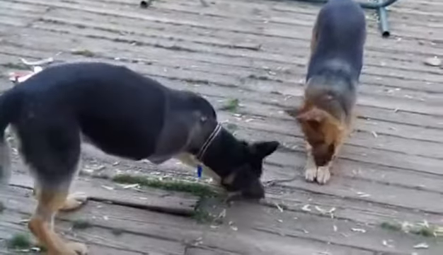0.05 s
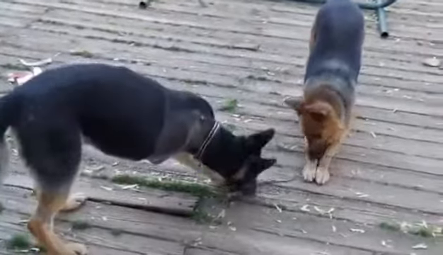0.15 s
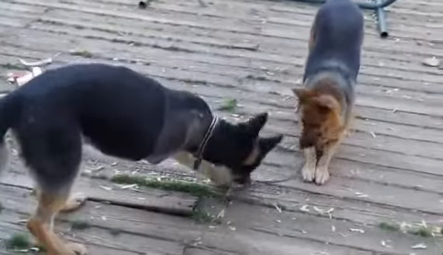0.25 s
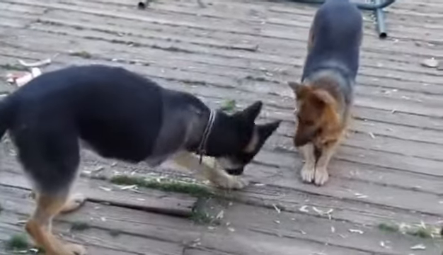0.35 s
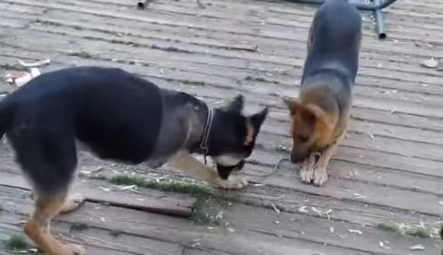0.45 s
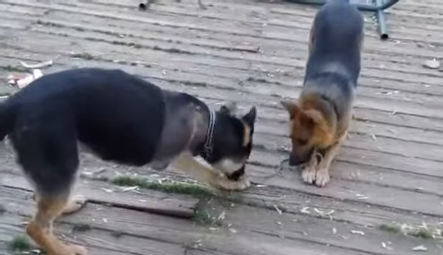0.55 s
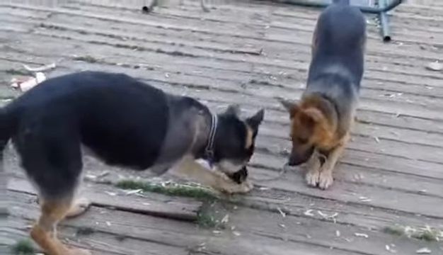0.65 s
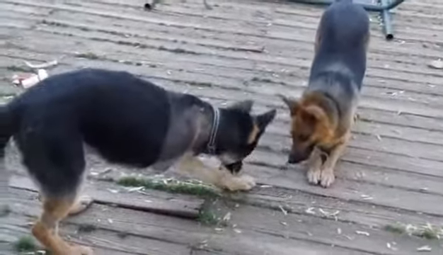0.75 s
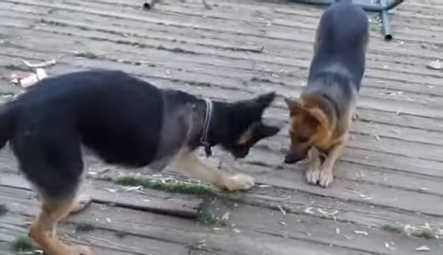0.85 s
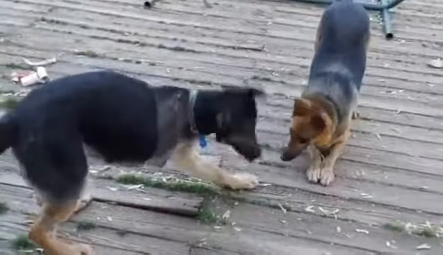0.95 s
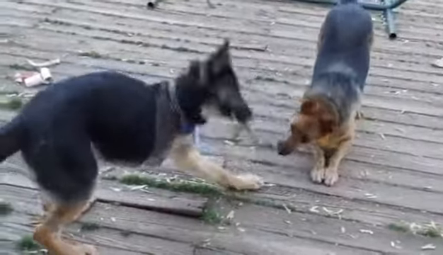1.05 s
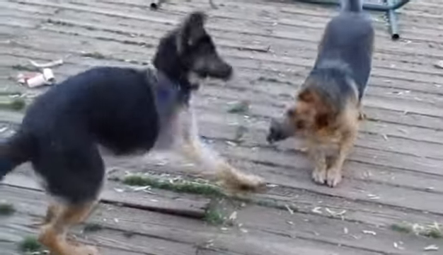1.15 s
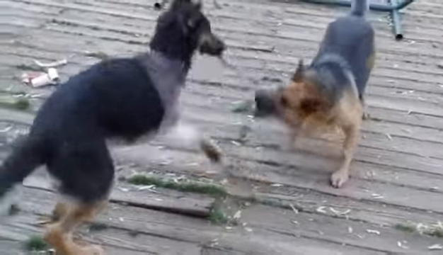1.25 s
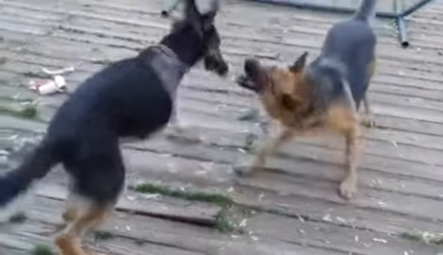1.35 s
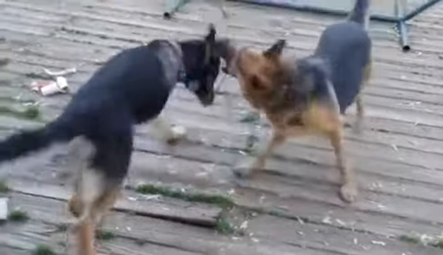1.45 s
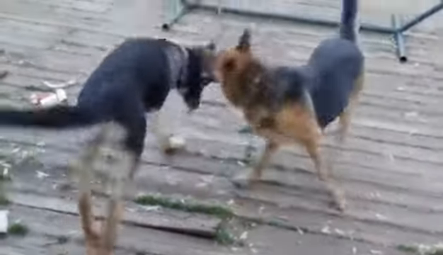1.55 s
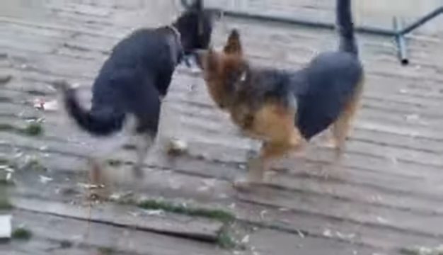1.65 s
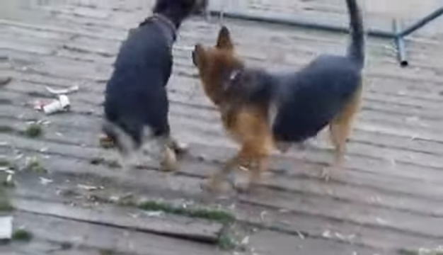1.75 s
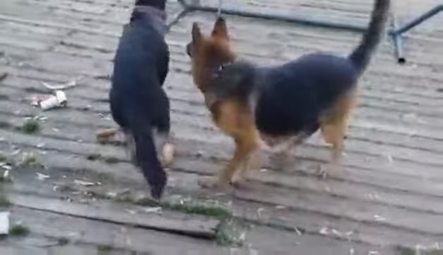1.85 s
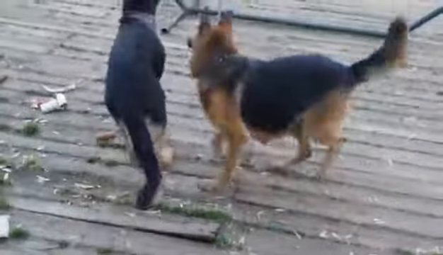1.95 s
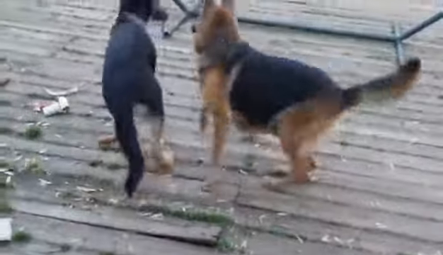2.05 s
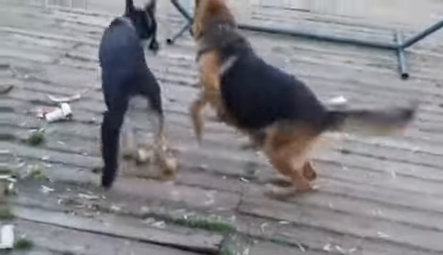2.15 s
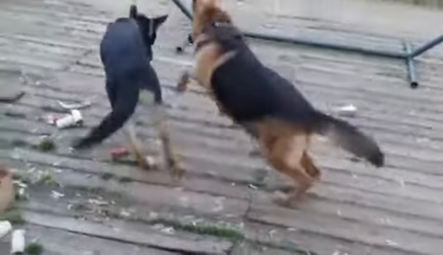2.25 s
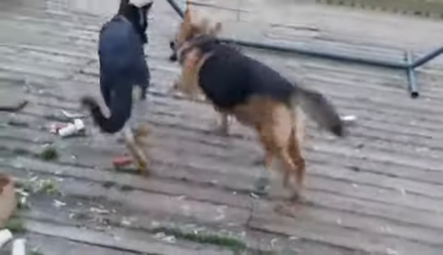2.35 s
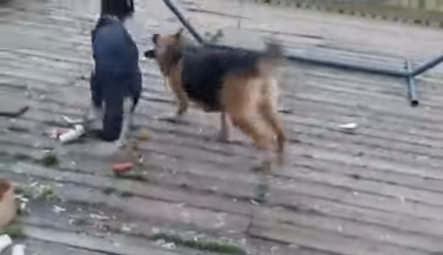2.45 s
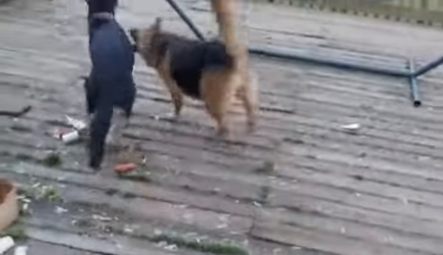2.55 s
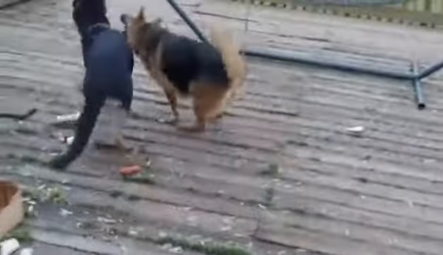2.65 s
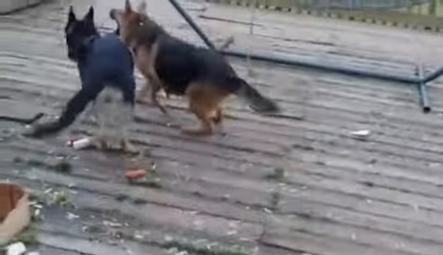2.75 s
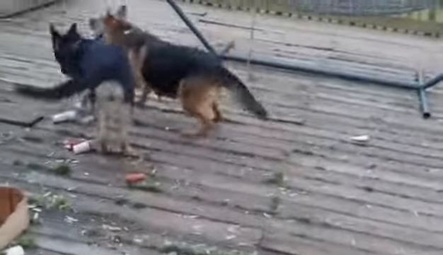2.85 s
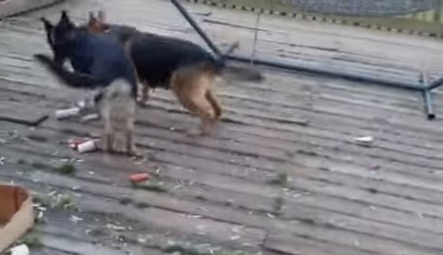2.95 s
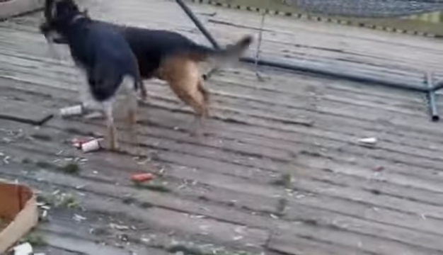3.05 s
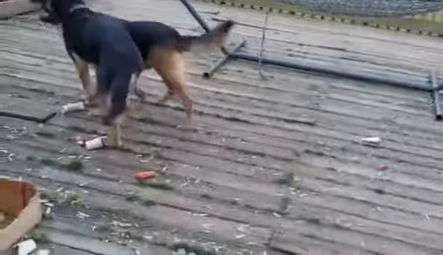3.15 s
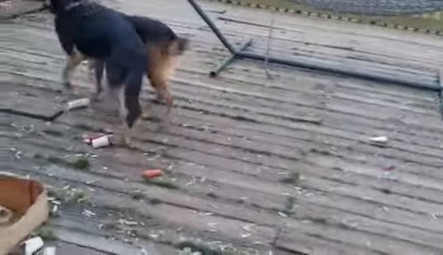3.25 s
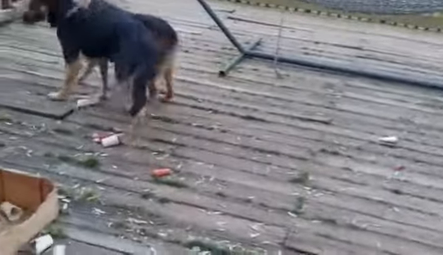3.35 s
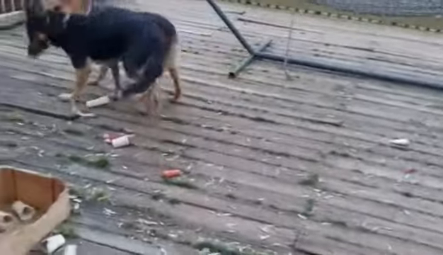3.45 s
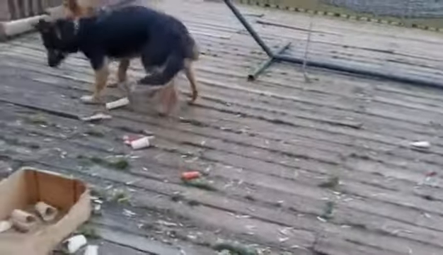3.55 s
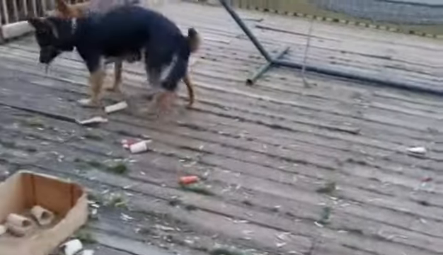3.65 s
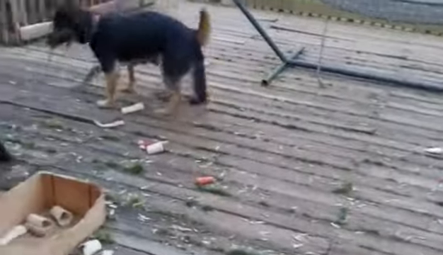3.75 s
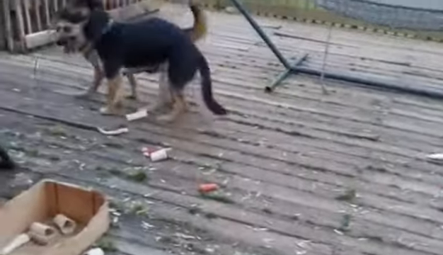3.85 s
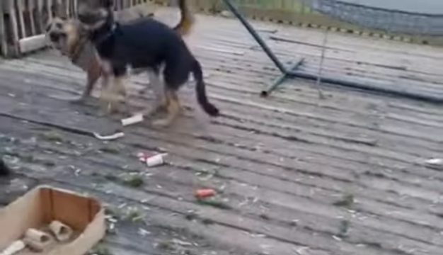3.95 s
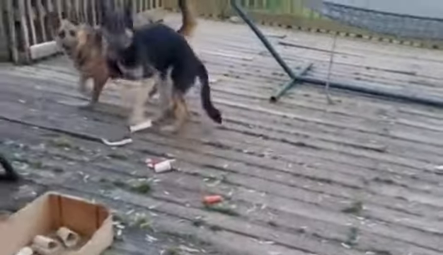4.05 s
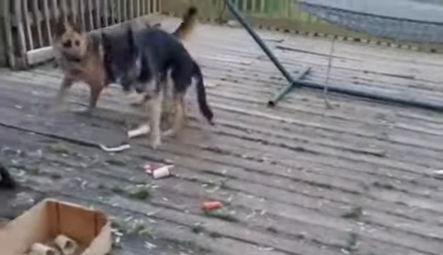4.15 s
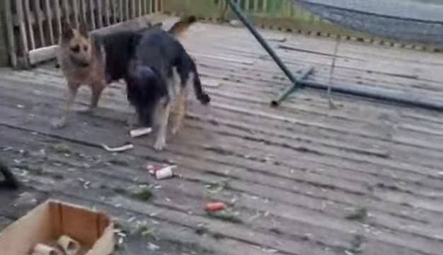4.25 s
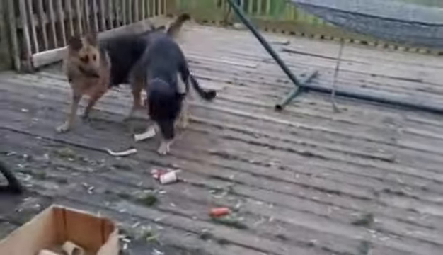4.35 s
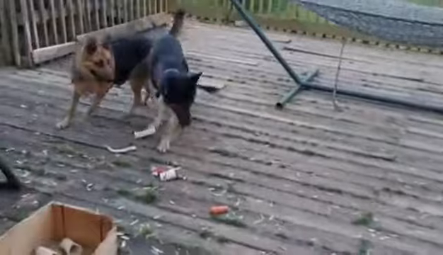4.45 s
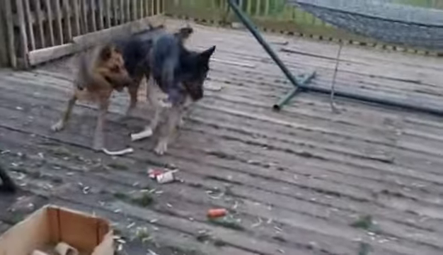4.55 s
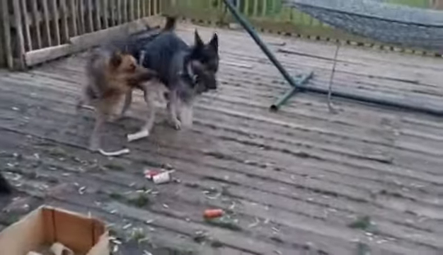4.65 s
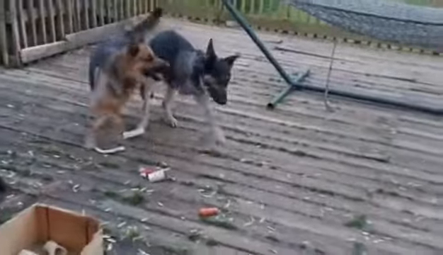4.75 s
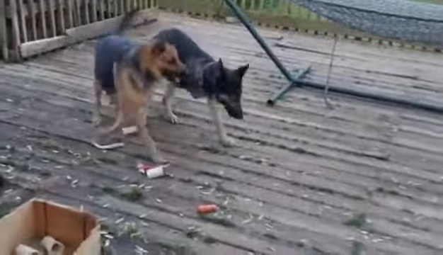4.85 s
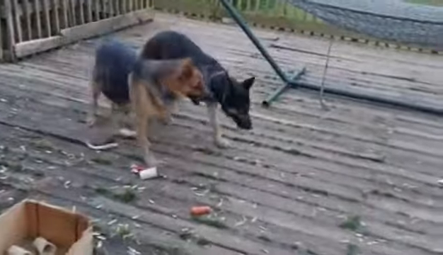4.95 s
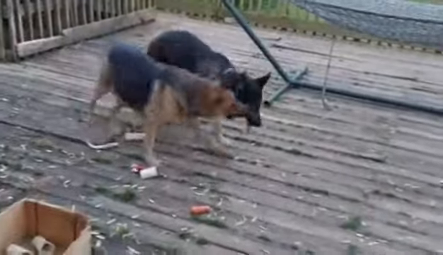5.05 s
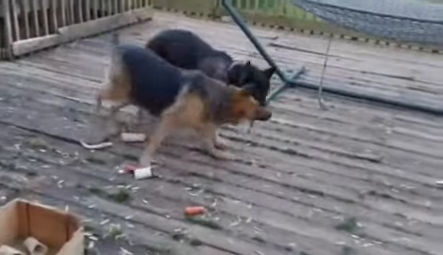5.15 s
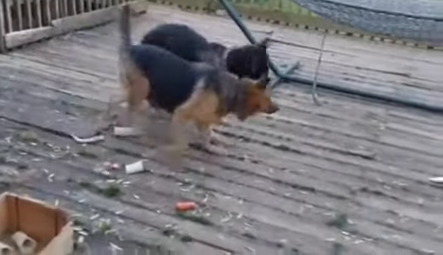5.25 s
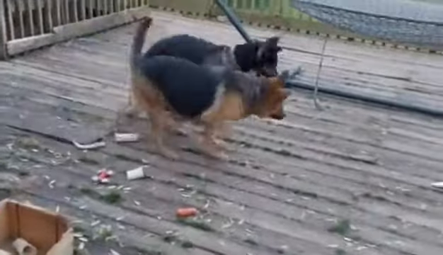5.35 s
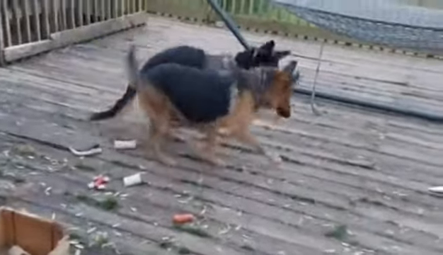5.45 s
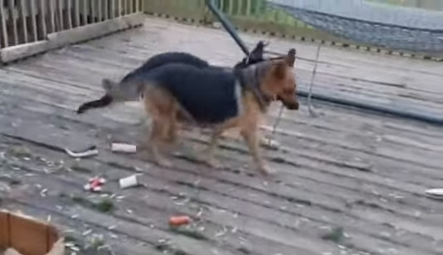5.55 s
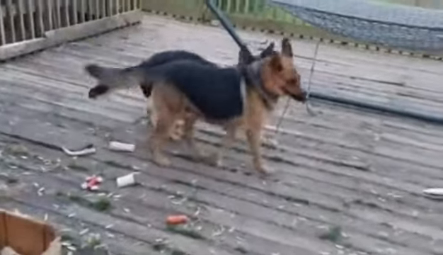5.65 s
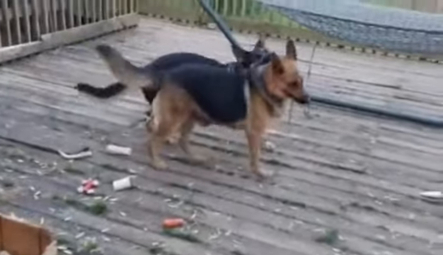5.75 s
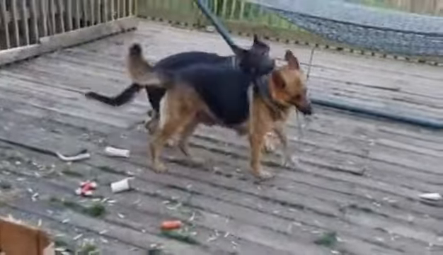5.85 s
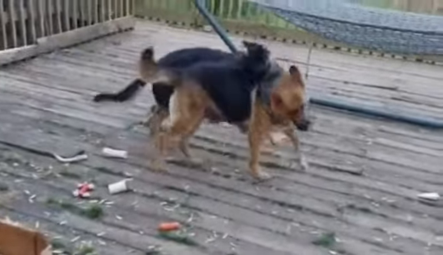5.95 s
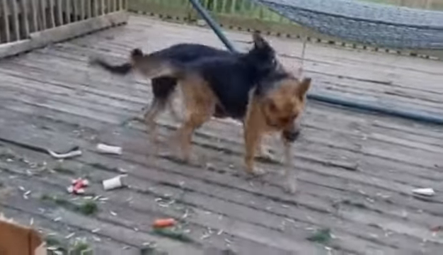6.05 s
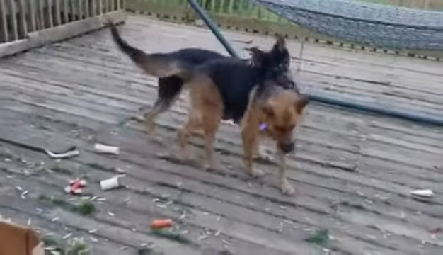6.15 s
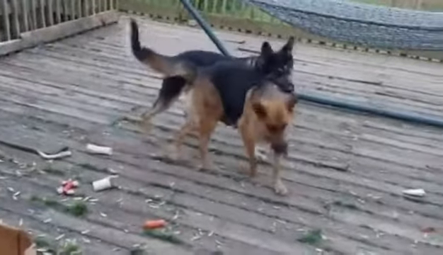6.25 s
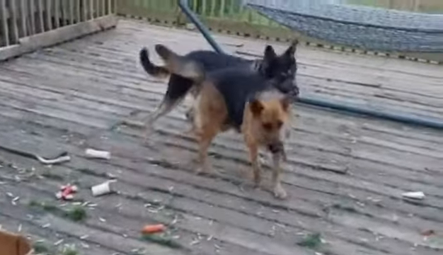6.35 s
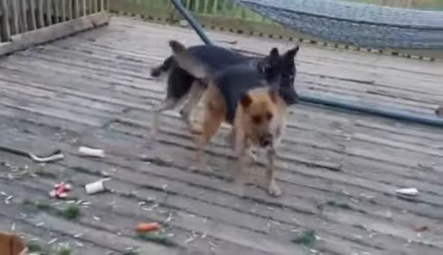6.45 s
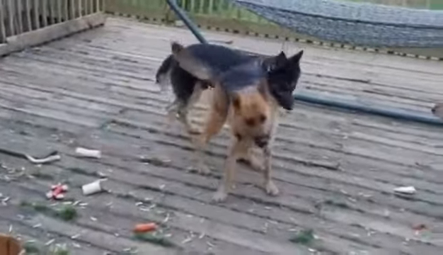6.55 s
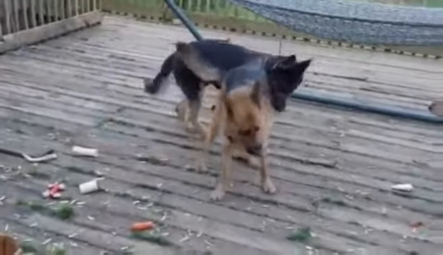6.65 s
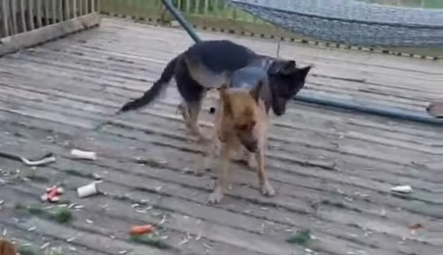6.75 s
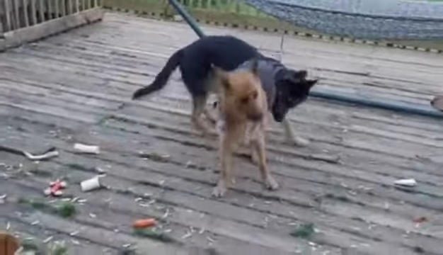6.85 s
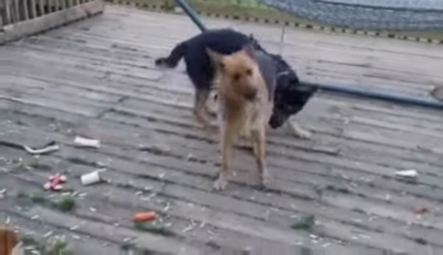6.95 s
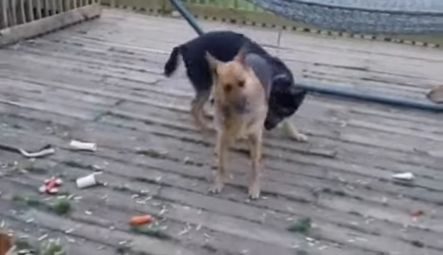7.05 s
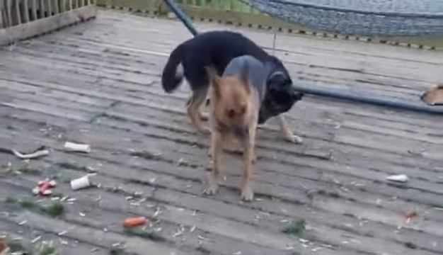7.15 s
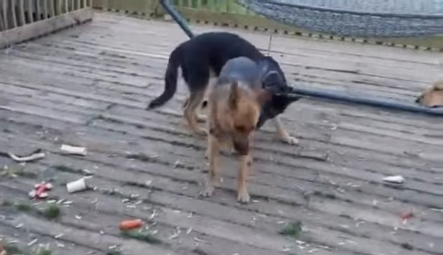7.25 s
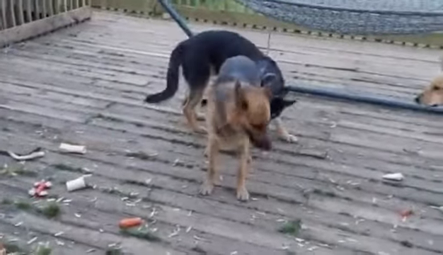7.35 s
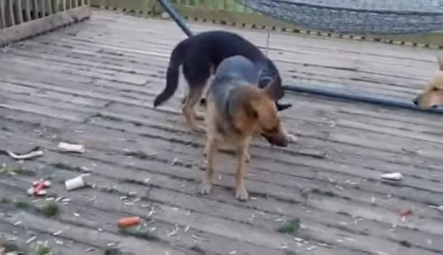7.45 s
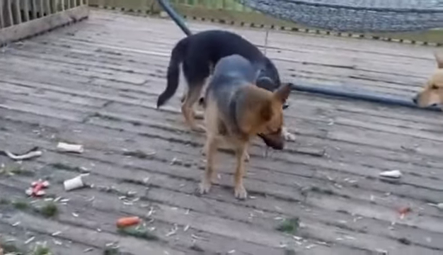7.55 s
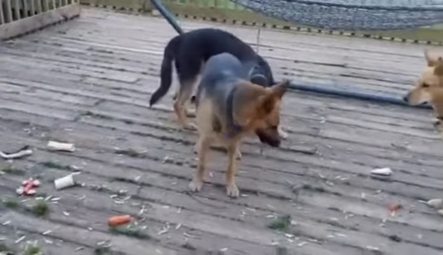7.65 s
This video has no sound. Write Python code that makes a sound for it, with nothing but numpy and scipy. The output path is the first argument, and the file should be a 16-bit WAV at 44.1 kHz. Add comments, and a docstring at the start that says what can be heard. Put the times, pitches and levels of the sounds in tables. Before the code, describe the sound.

Outdoors on a wooden deck, heard in stereo from a few metres. The first second is nearly silent: faint low yard rumble and a barely audible tap around 0.6. From 1.0 claws tick and scratch, and at 1.4 a paw lands with a hollow thud; faint collar tags clink between 1.5 and 1.7. Scraping and low thumps grow through 2.5. At 2.63 comes a bright claw snap with a short choked metal ping, then a dense clatter of woody knocks and heavy thuds until 3.3, with separate hits at 3.5 and 3.75. It calms around 4, leaving light scuffs. Scraping resumes at 4.6, hard knocks cluster from 4.9 to 5.2, and another burst ends with a strong thump at 5.6. A short, rough, low growl follows from 5.8 to 6.25. Soft drags and ticks continue, one thud falls at 6.9, and a low distant motor hum swells to the end at 7.7.

```python
"""Dogs wrestling on a deck

Two big dogs wrestle on a wooden deck, a few metres from a phone with two microphone ports.
Thuds and knocks ring the deck modes; claws tick and scrape as filtered noise and stick-slip grit.
Tags and a metal tube ring as decaying sines; a pulse train through throat resonances growls.
Behind them: shaped noise for the yard, two narrow noise lines for a motor, and scattered echoes."""
import sys
import numpy as np
from scipy import signal
from scipy.fft import rfft, irfft, next_fast_len
from scipy.io import wavfile
from scipy.ndimage import uniform_filter1d, map_coordinates

SR = 44100
rng = np.random.default_rng(int(sys.argv[2]) if len(sys.argv) > 2 else 0)


def put_to_file(sound):
    """Save the sound as 16-bit audio at rate SR, in the file named by the first command-line argument."""
    columns = np.atleast_2d(sound).T  # one column per channel
    safe = np.clip(columns, -1, 1)
    whole_steps = np.round(safe * 32767)
    wavfile.write(sys.argv[1], SR, whole_steps.astype(np.int16))


N = 340011
T = np.arange(N) / SR

# yard noise, relative density: (frequency [Hz], level [dB])
YARD_SPECTRUM = [(18, -18), (30, -2), (130, 2.5), (223, -3.5), (435, -35), (592, -12.5), (1160, -33),
                 (3870, -45.5), (4400, -47), (5410, -38.5), (12300, -36.5), (14000, -69.5)]
YARD_DB = -62
# motor lines: (frequency [Hz], width of each of two filter passes [Hz])
HUM_LINES = [(86, 12), (587, 30)]
# motor loudness: (time [s], low line level [dB], high line level [dB])
HUM_LEVELS = [(0, -84, -90), (3.3, -59.5, -82), (4.2, -68, -74.5), (6.901, -68, -75), (7.301, -61, -71),
              (7.71, -51, -77)]
# growl contour: (time [s], pitch before jitter and bend [Hz], level [dB])
GROWL_CONTOUR = [(5.791, 118, -43.5), (5.859, 120.3, -42.5), (5.89, 123.6, -33), (5.959, 123.5, -33),
                 (6.082, 122, -37), (6.15, 119, -40), (6.179, 121.5, -46), (6.27, 110.8, -61)]
# throat and muzzle resonances: (frequency [Hz], width per pass [Hz], relative level [dB])
THROAT_MODES = [(117, 87, 1.5), (214, 81, -3), (369, 69, -9), (502, 110, -6.5), (720, 90, -9),
                (1250, 400, -18.5)]
# deck modes before detuning and damping: (frequency [Hz], relative level [dB], t60 [s])
DECK_MODES = [(67, 5, 0.34), (98.469, 6, 0.21), (125.9, 5.5, 0.15), (194.2, 2.5, 0.07662), (230.6, 0, 0.13),
              (398, -.5, 0.1308), (527, -5, 0.086), (630, 4, 0.08), (719.47, -2, 0.07), (922, 2, 0.07696),
              (1074, 2.5, 0.042), (1344, -0.5, 0.06), (1517, -3.5, 0.06)]
# claw scrape, relative density: (frequency [Hz], level [dB])
SCRAPE_SPECTRUM = [(880, -46), (1500, -19), (3640, -12), (5250, -9), (6510, -12.5), (7280, -9.5),
                   (9910, -19.5), (12500, -8.5), (13400, -17), (14000, -54.5)]
# paws dragged over the boards; a negative build-up all but mutes its row:
# (time of full force [s], build-up over 20 dB [s], fade by 20 dB [s],
#  claw scrape level [dB], board rasp level [dB], deck rumble level [dB])
DRAGS_TABLE = [(1.05, 0.1, 0.4, -57, -83, -80), (1.255, 0.14, 0.9918, -58, -58.5, -73.5),
               (1.439, .25, 0.17, -52, -53, -56), (1.63, 0.1, .2, -55.5, -54, -63),
               (1.822, 0.16, 0.14, -45.5, -58, -45.5), (1.999, .12, 0.21, -47, -47, -52),
               (2.118, 0.4, 0.13, -62.5, -56, -47.5), (2.459, -0.02, .07, -49, -52.5, -38.5),
               (2.55, .012, .07, -46, -50, -42), (2.642, .011, .25, -47, -39, -46),
               (2.82, 0.15, .35, -58, -47, -40), (3.02, 0.16, .33, -62, -52, -42),
               (3.221, 0.1, 0.1, -49, -56, -39), (3.489, .008, .22, -56, -44, -40),
               (3.762, .008, .17, -70, -55, -53), (3.93, .15, 0.4844, -64, -69, -75),
               (4.4, .15, .1, -58, -62.5, -69), (4.614, 0.15, 0.16, -50.5, -47.5, -55),
               (4.9, .2, 0.26, -58, -54.5, -48), (5.06, 0.22, .4, -51, -48, -45),
               (5.45, 0.08, 0.21, -51.5, -51.5, -43.5), (5.5, 0.1, 0.12, -56, -46, -48),
               (5.589, .008, .24, -51.5, -46, -38), (6.4, .08, 0.12, -55.5, -54, -76),
               (6.589, 0.23, 0.17, -66, -53.5, -72), (6.809, 0.2, 0.11, -55, -58, -57),
               (6.997, 0.53, 0.11, -59.5, -55, -54.5)]
# feet that never quite rest: (time [s], level before the mix offsets [dB])
FIDGET_LEVELS = [(0, -79.5), (.95, -80), (1.3, -71), (2.3, -67.5), (3.4, -68), (4.15, -74), (5.3, -68),
                 (6.9, -72.5), (7.1, -78.5), (7.71, -83)]
# fidget offsets: scrape, rasp, rumble [dB]
FIDGET_OFFSETS_DB = [0.5, -3, 4.5]
# pads landing: (time [s], peak level [dB], frequency the board favours [Hz])
PAD_THUDS = [(0.577, -51, 235.7), (1.398, -32, 96), (1.416, -22.5, 189), (1.44, -31, 130),
             (1.612, -42.5, 201), (1.79, -35, 97.91), (1.832, -35, 102.3), (2.075, -29, 146),
             (2.101, -26.5, 116.2), (2.369, -37.5, 148.4), (2.442, -29, 89.62), (2.673, -26, 236.9),
             (2.708, -24.5, 270), (2.762, -28, 240), (2.79, -23, 240), (2.848, -18.5, 211),
             (2.931, -24, 223.1), (3.004, -29.5, 230), (3.048, -30, 236.4), (3.183, -32.5, 257.1),
             (3.483, -25, 232.4), (3.756, -41, 115.5), (3.884, -33.5, 93.2), (4.2, -48, 200),
             (4.592, -34.5, 74.76), (4.835, -27, 88.45), (5.119, -35, 81.27), (5.4, -37.5, 67.82),
             (5.455, -35.5, 205.8), (5.584, -23.5, 110), (5.795, -33.5, 110.3), (6.219, -40.5, 111.8),
             (6.895, -28, 130)]
# hard knocks on the boards: (time [s], peak level [dB], frequency the board favours [Hz])
HARD_KNOCKS = [(0.634, -48.5, 930), (1.31, -38, 997.6), (1.352, -23.5, 770), (1.454, -31, 1060),
               (1.615, -38.5, 1295), (2.557, -35, 884), (2.634, -24.5, 1200), (2.674, -22, 586.1),
               (2.694, -27, 1000), (2.708, -23.5, 620), (2.776, -25.5, 610), (2.798, -21, 595),
               (2.834, -29, 650), (2.849, -25.5, 596), (2.932, -22, 375.2), (3.086, -21, 610),
               (3.194, -26.5, 615.5), (3.219, -30, 617.3), (3.271, -37.5, 580), (3.484, -22, 736),
               (3.554, -26, 690), (3.758, -33.5, 717.9), (4.907, -22.5, 540.8), (4.955, -27, 390),
               (4.981, -28, 420), (4.996, -19.5, 790), (5.052, -20, 617), (5.104, -29, 361.8),
               (5.136, -23, 352.7), (5.165, -30.5, 990), (5.392, -41, 425.6), (5.462, -27.5, 600),
               (5.482, -30.5, 950), (5.526, -33, 900), (5.586, -17.5, 405), (5.706, -27, 350),
               (6.901, -34.5, 330)]
# claw ticks: (time [s], peak level [dB], frequency of the horny ring [Hz])
CLAW_TICKS = [(1.038, -35, 6900), (1.249, -30.5, 2970), (1.311, -29, 4870), (1.3527, -23.5, 4722),
              (1.421, -26.5, 5684), (1.4538, -26.5, 3633), (1.524, -31.5, 5650), (1.605, -30.5, 4350),
              (1.6172, -29.5, 4280), (1.727, -31.5, 7500), (1.8015, -29, 6520), (1.831, -22, 5350),
              (1.932, -36, 3178), (1.9965, -25, 2300), (2.166, -34, 3269), (2.3694, -35, 6300),
              (2.387, -39, 3320), (2.4533, -26, 13000), (2.5427, -20, 12450), (2.6333, -13.5, 3540),
              (2.7664, -23.5, 4770), (2.8942, -32.5, 5308), (3.214, -32.5, 5604), (3.483, -28.5, 1950),
              (3.55, -32, 11300), (3.7588, -38.5, 1891), (4.0769, -41.5, 11700), (4.598, -29.5, 5100),
              (4.898, -22.5, 7400), (4.9975, -27.5, 5289), (5.0504, -33.5, 2100), (5.251, -33, 12000),
              (5.498, -30, 5793), (5.526, -33, 2000), (5.5827, -24, 3000), (5.9879, -39, 11920),
              (6.2937, -42.5, 6110), (6.3617, -45, 5048), (6.894, -35.5, 8420), (7.026, -43.5, 5870),
              (7.2565, -43.5, 6000)]
# collar tags clinking: (time [s], peak level [dB], lower mode frequency [Hz])
TAG_CLINKS = [(1.5282, -33, 5420), (1.5699, -36, 7250), (1.6175, -34, 7220), (1.727, -36, 5210)]
# metal tube modes: (frequency [Hz], relative level [dB], t60 [s])
TUBE_MODES = [(1130, -5, .08), (1960, -6, .06), (2445, -6, .09), (3526, 0, .14), (3590, -6, .1),
              (5430, -9, .03)]
# paw hits on the tube: (time [s], peak level [dB])
TUBE_PINGS = [(2.634, -23), (2.643, -25)]
# where the dogs are: (time [s], left port lag [samples], left minus right treble [dB])
DOG_BEARING = [(0, 2, 2), (1.2, 2.5, 4), (2.2, 5, 1.5), (2.6, -3, 2), (4.3, -5, 1.5), (5.2, 1, 0.5),
               (6.3, -1, 2.5), (7.71, -2, 1)]

TAG_T60_S = 0.08
TUBE_HELD_S = 0.03  # the paw rests on the tube again and chokes it
TOP_HZ = 14379
PORTS = np.array([[1], [-1]])  # left, right


def undb(db):
    """Gain of a level in dB."""
    return 10 ** (np.asarray(db) / 20)


def unit(x):
    """Scale to rms 1."""
    return x / np.sqrt(np.mean(x ** 2))


def curves(table):
    """Interpolate the columns of a table along time."""
    s, *columns = np.transpose(table)
    return [np.interp(T, s, column) for column in columns]


def band(x, hz, width_hz):
    """Resonance with gain 1 at the centre."""
    return signal.lfilter(*signal.iirpeak(hz, hz / width_hz, SR), x)


def double_band(x, hz, width_hz):
    """Same resonance twice, for steeper skirts."""
    return band(band(x, hz, width_hz), hz, width_hz)


def colour(x, spectrum):
    """Filter by (frequency [Hz], level [dB]) points, joined over log frequency."""
    size = next_fast_len(N)
    hz, db = np.transpose(spectrum)
    bins_hz = np.maximum(np.arange(size // 2 + 1) * SR / size, 1)
    gain = undb(np.interp(np.log(bins_hz), np.log(hz), db))
    return irfft(rfft(x, size) * gain, size)[..., :N]


def walk(rate_hz):
    """Random levels held 1 / rate_hz and slewed twice, rms 1."""
    hold = int(SR / rate_hz)
    steps = np.repeat(rng.standard_normal(N // hold + 1), hold)
    return unit(uniform_filter1d(uniform_filter1d(steps, hold), hold)[:N])


def ring(modes, detune, rise_s):
    """Modes struck once; a soft contact lets them rise slowly."""
    hz, db, t60_s = np.transpose(modes)[:, :, None]
    t = T[:SR // 5]
    tones = np.sin(2 * np.pi * hz * (1 + 0.047805 * detune) * t)
    x = np.sum(undb(db - 60 * t / t60_s) * tones, axis=0) * (1 - np.exp(-t / rise_s))
    return x / np.max(np.abs(x))


def add(out, s, x, peak_db):
    """Lay in a sound; legs and boards close by scatter its upper part differently to each port."""
    t = T[:SR // 100]
    noise = rng.standard_normal((2, len(t)))
    paths = signal.lfilter(*signal.butter(2, 450, "high", fs=SR), noise) * undb(-60 * t / 0.012)
    paths = 1.07 * paths / np.sqrt(np.sum(paths ** 2, axis=1, keepdims=True))
    paths[:, 0] += 1  # direct sound
    i = int(s * SR)
    both = signal.fftconvolve(x[None], paths, axes=1)[:, :N - i]
    out[:, i:i + both.shape[1]] += both * undb(peak_db) / np.max(np.abs(both))


def yard():
    """Far traffic and leaves: shaped noise wavering gently, nearly alike at both ports in the bass."""
    mid, side = (colour(rng.standard_normal(N), YARD_SPECTRUM) for _ in range(2))
    side = side - uniform_filter1d(side, size=60)
    return unit(mid + side * PORTS) * undb(YARD_DB + 2 * walk(5.75))


def motor():
    """Far motor: two narrow noise lines, each with its own loudness curve."""
    hum = np.zeros(N)
    for (hz, width_hz), db in zip(HUM_LINES, curves(HUM_LEVELS)):
        hum += undb(db) * unit(double_band(rng.standard_normal(N), hz, width_hz))
    return hum


def fence(x, t60_s=0.25, wet_db=-9):
    """Scattered echoes off house wall and railings, different at each port and thin in the bass."""
    t = T[:SR // 2]
    tail = rng.standard_normal((2, len(t))) * undb(-60 * t / t60_s) * (t > 0.002)
    tail = signal.lfilter(*signal.butter(1, 500, "high", fs=SR), tail)
    tail = tail / np.sqrt(np.sum(tail ** 2, axis=1, keepdims=True))
    return undb(wet_db) * signal.fftconvolve(x[None], tail, axes=1)[:, :N]


def growl(breath=0.85, rasp_db=-33, jitter=0.1, scatter_db=4.0):
    """Uneven throat pulses with a puff of air on each, through the throat and muzzle."""
    hz, level_db = curves(GROWL_CONTOUR)
    start_s, end_s = GROWL_CONTOUR[0][0], GROWL_CONTOUR[-1][0]
    phase = np.cumsum(hz * (1 + jitter * walk(100))) / SR
    pulses = np.diff(np.floor(phase), prepend=0) * undb(scatter_db * walk(140))
    puffs = np.exp(-(phase % 1) / 0.69) * rng.standard_normal(N)
    source = unit(pulses) + breath * puffs
    voice = np.zeros(N)
    for k, (mode_hz, width_hz, db) in enumerate(THROAT_MODES):
        voice += (-1) ** k * undb(db) * unit(double_band(source, mode_hz, width_hz))
    # head and jaw move, bending pitch and throat together
    bend = np.cumsum(0.035 * walk(25))
    moments = np.arange(N) + bend - bend[int(start_s * SR)]
    voice = map_coordinates(voice, [moments], order=1, mode="mirror")
    teeth_air = unit(double_band(rng.standard_normal(N), 4400, 1500))
    voice = unit(voice) + undb(rasp_db + 2.2 * walk(60)) * teeth_air
    on = np.clip(np.minimum(T - start_s, end_s - T) / 0.01186, 0, 1)
    # lung pressure holds the loudness even
    steady = voice / np.sqrt(uniform_filter1d(voice ** 2, size=SR // 14))
    return on * undb(level_db) * steady


def grit(rate_hz, scatter_db):
    """Stick-slip clicks at random moments, a few far louder; each lies a little left or right."""
    clicks = (rng.random(N) < rate_hz / SR) * rng.standard_normal(N)
    clicks = clicks * undb(scatter_db * rng.exponential(size=N))
    return unit(clicks * (1 + 1.046 * rng.standard_normal(N) * PORTS))


def drag_gains():
    """Drags build up and fade at an even rate in dB; their powers add to the fidgeting."""
    power = undb(curves(FIDGET_LEVELS)[0] + np.array(FIDGET_OFFSETS_DB)[:, None]) ** 2
    for s, rise_s, fade_s, *db in DRAGS_TABLE:
        span = slice(int((s - 3 * rise_s) * SR), int((s + 3 * fade_s) * SR))
        t = T[span] - s
        drop_db = 20 * np.maximum(-t / rise_s, t / fade_s)
        power[:, span] += undb(np.array(db)[:, None] - drop_db) ** 2
    return np.sqrt(power)


def claw_scrape():
    """Shaped grit plus narrow squeaks, each wavering in level on its own pitch."""
    hiss = colour(grit(6000, 2.0) + 0.5 * grit(400, 3.0), SCRAPE_SPECTRUM)
    squeaks = sum(undb(6.0 * walk(30)) * band(hiss, hz, hz / 30)
                  for hz in np.geomspace(2200, 12000, num=9))
    return unit(unit(hiss) + 0.9 * unit(squeaks))


def board_rasp():
    """Dense slips stir the upper deck modes; soft pads hardly stir the treble."""
    slips = grit(5000, 1.2)
    rasp = 0.45 * band(slips, 1610, 1800)
    for hz, db, t60_s in DECK_MODES:
        if hz > 330:
            rasp += undb(db) * band(slips, hz, 10.303 / t60_s)
    return unit(band(rasp, 620, 2000))


def deck_rumble():
    """Sparser shoves stir the low deck modes, alike at both ports."""
    shoves = grit(400, 1.5).mean(axis=0)
    return unit(sum(undb(db) * band(shoves, hz, 2.5 / t60_s)
                    for hz, db, t60_s in DECK_MODES if hz < 330))


def scuffle():
    """Scrape, rasp and rumble follow the drag force, with random jerks in level."""
    jerk_db = 3.0 * np.array([walk(50), walk(40), walk(25)])
    gain = drag_gains() * undb(jerk_db)
    return gain[0] * claw_scrape() + gain[1] * board_rasp() + gain[2] * deck_rumble()


def tags(out):
    """Collar tags clink: two close decaying modes."""
    for s, db, hz in TAG_CLINKS:
        modes = [(hz, 0, TAG_T60_S), (1.03 * hz, -6, TAG_T60_S / 2)]
        add(out, s, ring(modes, np.zeros((1, 1)), 0.001), db)


def tube(out):
    """A paw pings a metal tube, then damps its modes by 26 dB within 10 ms."""
    for s, db in TUBE_PINGS:
        ping = ring(TUBE_MODES, np.zeros((1, 1)), 0.0004)
        choke = np.clip((T[:len(ping)] - TUBE_HELD_S) / 0.01, 0, 1)
        add(out, s, ping * undb(-26 * choke), db)


def claws(out):
    """A claw bites in, snaps with a horny ring, then skids over the grain."""
    t = T[:SR // 10]
    shape = (1 - np.exp(-t / 0.0009)) * (undb(-60 * t / 0.033) + undb(-17 - 60 * t / 0.09))
    for s, db, hz in CLAW_TICKS:
        grain_db = rng.exponential(size=len(t) // 40 + 1).repeat(40)[:len(t)]
        noise = rng.standard_normal(len(t)) * undb(grain_db)
        tick = (unit(noise) * 0.86 + unit(band(noise, hz, hz / 5))) * shape
        # thin the bass, more so for high ticks
        if hz > 6000:
            tick = np.diff(tick, prepend=0)
        else:
            tick = tick - uniform_filter1d(tick, size=24)
        add(out, s, tick, db)


def boards(hz, spread_oct, stretch, rise_s, rattle_db, rattle_s):
    """Deck struck where modes near hz answer most; smaller bounces follow the first contact."""
    modes = np.array(DECK_MODES)
    modes[:, 1] -= 6 * (np.log2(modes[:, 0] / hz) / spread_oct) ** 2
    modes[:, 1] += 3 * rng.standard_normal(len(modes))  # every spot stirs the modes differently
    modes[:, 2] *= stretch
    t = T[:SR // 8]
    bounces = (rng.random(len(t)) < 400 / SR) * rng.standard_normal(len(t))
    contact = bounces * undb(rattle_db - 60 * t / rattle_s)
    contact[0] = 1
    return signal.fftconvolve(ring(modes, rng.standard_normal((len(modes), 1)), rise_s), contact)


def knocks(out):
    """Chew bones get knocked about: hard, quick contacts ring the boards briefly."""
    for s, db, hz in HARD_KNOCKS:
        add(out, s, boards(hz, 0.85, 0.5, 0.00041, -7, 0.11), db)


def thuds(out):
    """Pads land: soft, slow contacts ring the boards."""
    for s, db, hz in PAD_THUDS:
        add(out, s, boards(hz, 0.52, 0.68, 0.0031, -8, 0.12), db)


def blows():
    """All single impacts on two ports."""
    out = np.zeros((2, N))
    for source in (tags, tube, claws, knocks, thuds):
        source(out)
    return out


def bearing(dogs):
    """The phone body shades only the treble; sound reaches one port a little late."""
    lag, pan_db = curves(DOG_BEARING)
    bass = signal.lfilter(*signal.butter(1, 900, fs=SR), dogs)
    ports = []
    for low, full, side in zip(bass, dogs, (1, -1)):
        shaded = low + (full - low) * undb(side * pan_db / 2)
        ports.append(map_coordinates(shaded, [np.arange(N) - side * lag / 2], order=3))
    return np.array(ports)


def scene():
    """Dogs placed by bearing, their echoes, and the yard with its motor."""
    dogs = growl() + scuffle() + blows()
    return bearing(dogs) + fence(dogs.mean(axis=0)) + yard() + motor()


def record(dry):
    """The microphone falls off under 45 Hz and above 13 kHz, and the top is cut at TOP_HZ."""
    x = signal.sosfilt(signal.cheby1(8, 0.5, 13000, fs=SR, output="sos"), dry)
    x = signal.sosfilt(signal.butter(2, 45, "high", fs=SR, output="sos"), x)
    return signal.sosfilt(signal.ellip(8, 0.2, 60, TOP_HZ, fs=SR, output="sos"), x)


dry = scene()
out = record(dry)
put_to_file(out)
```